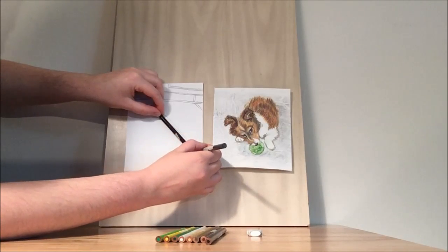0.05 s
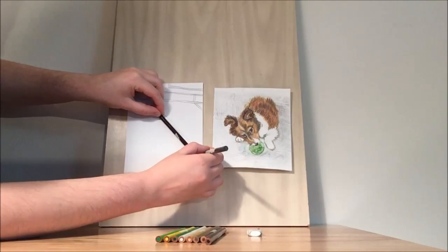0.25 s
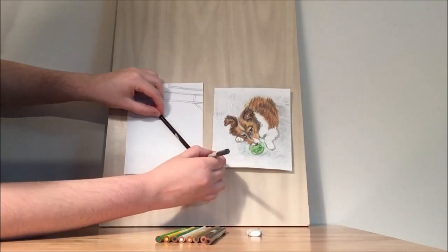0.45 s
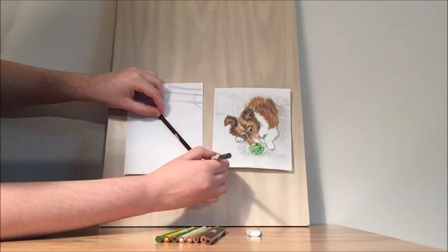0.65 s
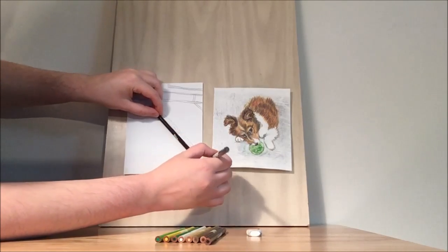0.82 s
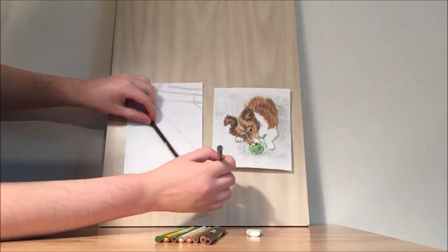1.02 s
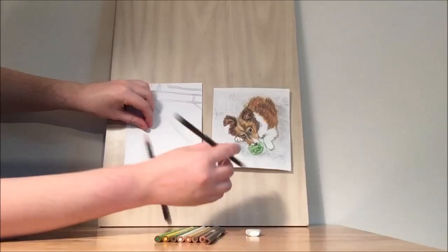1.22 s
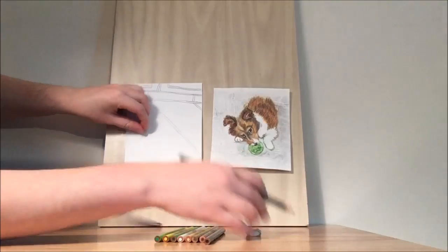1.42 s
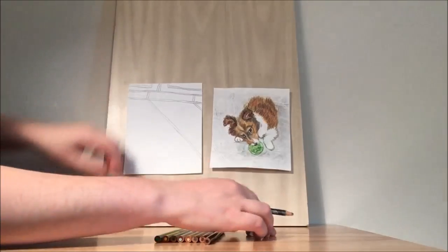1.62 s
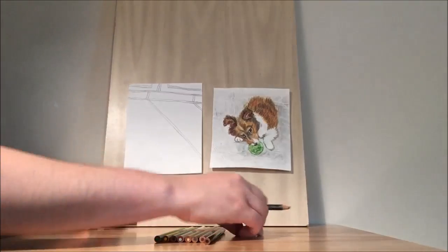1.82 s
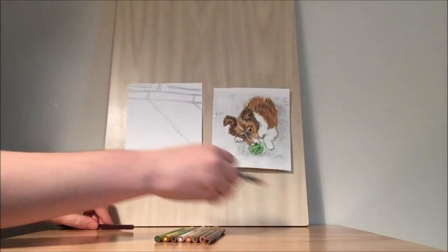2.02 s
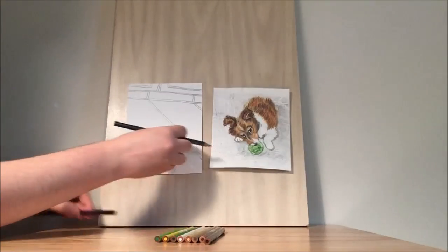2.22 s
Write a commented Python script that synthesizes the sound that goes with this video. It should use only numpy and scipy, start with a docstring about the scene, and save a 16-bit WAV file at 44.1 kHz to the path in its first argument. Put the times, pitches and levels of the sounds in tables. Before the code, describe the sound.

A wooden pencil drops and bounces on a wooden tabletop, then knocks and rattles against other pencils

```python
"""Small hard-walled room with wooden pencils: one rubs and taps on paper pinned to a leaning board,
drops onto the table, bounces, and is knocked against a row of other pencils.
Blows are banks of decaying sine modes; rubbing, rustle and rattle are shaped noise under drawn levels.
The room adds early echoes and a ringing tail, over a low appliance drone and air noise."""
import sys
import numpy as np
from scipy import signal
from scipy.fft import rfft, irfft
from scipy.io import wavfile
from scipy.ndimage import uniform_filter1d

SR = 44100
rng = np.random.default_rng(int(sys.argv[2]) if len(sys.argv) > 2 else 0)


def log_audio(samples):
    """Write samples as a 16-bit WAV file to the path given in sys.argv[1]."""
    # one column per channel
    frames = np.atleast_2d(samples).T
    # limit to full scale, then quantise
    limited = np.clip(frames, -1, 1)
    pcm = np.round(limited * 32767).astype(np.int16)
    wavfile.write(sys.argv[1], SR, pcm)


def how_loud(loudness_db):
    """Turn decibels into a plain amplitude multiplier (0 dB gives 1, 20 dB gives 10)."""
    steps = np.asarray(loudness_db, float) / 20
    return 10 ** steps


N = 99313  # length in samples


def unit(x):
    """Scale to rms 1."""
    return x / np.sqrt(np.mean(x ** 2))


def colour(x, points):
    """Shape a signal's spectrum by (f/Hz, level/dB) points on a log-frequency axis."""
    hz, db = np.array(points, float).T
    f = np.maximum(np.fft.rfftfreq(len(x), 1 / SR), 1)
    gain = how_loud(np.interp(np.log(f), np.log(hz), db))
    return irfft(rfft(x) * gain, len(x))


def band(x, hz, width_hz):
    """Resonant band-pass, gain 1 at the centre."""
    b, a = signal.iirpeak(min(hz, .45 * SR), hz / width_hz, fs=SR)
    return signal.lfilter(b, a, x)


def low_cut(x, order, hz):
    """Butterworth high-pass."""
    return signal.sosfilt(signal.butter(order, hz, "high", fs=SR, output="sos"), x)


def noise(length=N):
    """White noise."""
    return rng.standard_normal(length)


def walk(rate):
    """Random levels held 1 / rate s and slewed twice."""
    k = int(SR / rate)
    steps = np.repeat(noise(N // k + 1), k)
    return 0.45 * uniform_filter1d(uniform_filter1d(steps, k), k)[:N]


def curve(rows):
    """Gain along a (t/s, level/dB) table, -120 dB outside it."""
    s, db = np.array(rows, float).T
    return how_loud(np.interp(np.arange(N) / SR, s, db, left=-120, right=-120))


def decay(t, t60):
    """Exponential decay, falling 60 dB in t60 seconds."""
    return 1000. ** (-t / t60)


CONTACT_S = 0.00076  # a hard pencil blow
MODE_SCATTER_DB, DETUNE = 1.5, .006  # random spread of mode level and relative frequency


def ring(modes, contact_s):
    """One blow on a set of modes, each a little detuned and struck unevenly, rising over the contact time."""
    t = np.arange(SR // 4) / SR
    hz, db, t60 = np.array(modes, float).T[:, :, None]
    uneven, detune, phase = rng.standard_normal((3, len(modes), 1))
    sines = np.sin(2 * np.pi * hz * (1 + DETUNE * detune) * t + phase)
    tones = how_loud(db + MODE_SCATTER_DB * uneven) * sines * decay(t, t60)
    rise = np.sin(np.pi / 2 * np.minimum(t / contact_s, 1)) ** 2
    return tones.sum(axis=0) * rise / 2


def add(out, s, x):
    """Mix x into out from time s."""
    i = int(s * SR)
    out[i:i + len(x)] += x[:N - i]


# tone balance of the room air ahead of its low cut: (f/Hz, level/dB per Hz)
AIR_COLOUR = [(15, -33.5), (25, -8), (82, 3), (134, -13.5), (175, -8.5), (195, -29.5), (236, -10),
              (363, -10), (463, -19.5), (545, -15.5), (1560, -20), (2000, -26), (4200, -38), (16000, -46)]
AIR_DB, AIR_FLICKER_DB = -62, 1


def air():
    """Broad room noise: coloured noise with a slow, slight level flicker."""
    hiss = low_cut(colour(noise(), AIR_COLOUR), 3, 100)
    return how_loud(AIR_DB + AIR_FLICKER_DB * walk(6)) * unit(hiss)


# narrow noise bands of the appliance drone: (f/Hz, first filter width/Hz, level/dB)
DRONE_BANDS = [(85.8, 14, -65), (330.8, 31, -70.5), (395.4, 60, -77.5), (462.2, 7.5, -70), (7930, 200, -92)]
# steady lines of the drone, around which pitch and level waver: (f/Hz, level/dB)
HUM_LINES = [(48, -69.5), (90, -65.5)]
HUM_WAVER, HUM_WAVER_DB = 0.017, 5.5  # relative pitch and level depth per unit of walk


def drone():
    """Low appliance drone: narrow bands of noise and sine lines that waver in pitch and level."""
    out = np.zeros(N)
    for hz, width_hz, db in DRONE_BANDS:
        narrow = band(band(noise(), hz, width_hz), hz, 2 * width_hz)
        out += how_loud(db) * unit(narrow)
    for hz, db in HUM_LINES:
        level = how_loud(db + HUM_WAVER_DB * walk(8.0))
        cycles = np.cumsum(hz * (1 + HUM_WAVER * walk(5.99))) / SR
        out += level * unit(np.sin(2 * np.pi * cycles))
    return out


# pencil tip rubbing, heard through the board: (t/s, level/dB)
RUB_LEVEL = [(.3, -88), (.36, -74.5), (.56, -78), (.6, -79), (.92, -112), (.97, -71.5), (1.02, -76),
             (1.1, -67), (1.2, -70), (1.29, -65.5)]
RUB_HZ, RUB_WIDTH_HZ = 1590, 80


def tip_rub():
    """Uneven friction noise heard through the board's brightest mode."""
    friction = noise() * how_loud(2.9 * walk(37))
    return curve(RUB_LEVEL) * unit(band(friction, RUB_HZ, RUB_WIDTH_HZ))


# taps on the leaning board: (t/s, relative level/dB, extra level of the low modes/dB)
BOARD_TAPS = [(0.597, -39.5, -4), (0.6007, -35, -6.5), (0.630, -60.5, 13.5)]
# leaning board modes, the first two being the low ones: (f/Hz, relative level/dB, t60/s)
BOARD_MODES = [(465, 0.5, 0.19), (680, -4, 0.045), (1230, -5.5, 0.025), (1589, 2.5, 0.032),
               (1718, -10, 0.048)]
TAP_CONTACT_S = 0.00172
TAP_CLICK_DB, TAP_CLICK_T60_S, TAP_CLICK_HZ = -24, .012, 4400  # click level is relative to the tap


def board_taps():
    """Light taps ring the board's modes, each with a short bright click of noise."""
    out, t = np.zeros(N), np.arange(SR // 20) / SR
    for s, db, low_db in BOARD_TAPS:
        low = how_loud(low_db) * ring(BOARD_MODES[:2], TAP_CONTACT_S)
        add(out, s, how_loud(db) * (low + ring(BOARD_MODES[2:], TAP_CONTACT_S)))
        click = band(noise(len(t)), TAP_CLICK_HZ, TAP_CLICK_HZ) * decay(t, TAP_CLICK_T60_S)
        add(out, s, how_loud(db + TAP_CLICK_DB) * click)
    return out


# table top modes, lowest first: (f/Hz, relative level/dB, t60/s)
TABLE_MODES = [(144.2, -7, 0.16), (227, -8.5, 0.075), (272, 3, 0.14), (348.8, -0.5, 0.21), (463, 1.5, 0.05)]
THUD_CONTACT_S = 0.0065


def wrist_bump():
    """A wrist bumps the table: a soft, slow contact ringing only its two lowest modes."""
    out = np.zeros(N)
    add(out, 0.64, how_loud(-38) * ring(TABLE_MODES[:2], 2 * THUD_CONTACT_S))
    return out


# hands shifting on the board: (t/s, level/dB)
HANDS_LEVEL = [(.84, -94), (.88, -60.5), (.93, -69), (.98, -70.5), (1.12, -64.5), (1.2, -70.5), (1.27, -58),
               (1.32, -70)]
# their dull tone balance: (f/Hz, level/dB per Hz)
HANDS_TONE = [(90, -15.5), (140, -1), (200, -9), (300, -5), (450, -10), (900, -12), (2000, -44.5)]


def hands():
    """Hands shifting on the board: dark noise with an uneven level."""
    shuffle = noise() * how_loud(2 * walk(40))
    return curve(HANDS_LEVEL) * unit(colour(shuffle, HANDS_TONE))


# fingers and pencil brushing the paper: (t/s, relative level/dB)
RUSTLE_LEVEL = [(0.9, -100), (0.952, -78.5), (1.045, -75.5), (1.085, -65), (1.14, -64), (1.195, -73),
                (1.23, -65), (1.248, -61.5), (1.288, -58), (1.298, -47), (1.308, -70), (1.4, -68),
                (1.45, -92.5)]
# tone balance laid over the grains: (f/Hz, level/dB per Hz)
RUSTLE_TONE = [(2500, -1.5), (4500, -7.5), (6000, 4), (9000, 5), (10500, 1.5), (12500, 5.5), (15500, 0),
               (16500, -26.5)]
RUSTLE_GAIN_DB, RUSTLE_GRAIN_DB, RUSTLE_PATCH_DB = 3, 11, -5  # overall gain, fast and slow flicker


def paper_rustle():
    """Grainy hiss of skin and wood on paper, each band flickering alone."""
    grains = np.zeros(N)
    for hz in 3000 * 1.25 ** np.arange(8):
        flicker_db = RUSTLE_GRAIN_DB * walk(130) + RUSTLE_PATCH_DB * walk(18)
        grains += band(noise(), hz, hz / 4) * how_loud(flicker_db)
    return how_loud(RUSTLE_GAIN_DB) * curve(RUSTLE_LEVEL) * unit(colour(grains, RUSTLE_TONE))


# the pencil scrapes free of the paper before it lands:
# (start t/s, length before the fade/s, relative level/dB, f/Hz, width of each filter pass/Hz)
PAPER_SCRAPES = [(1.237, 0.037, -55, 5450, 2510), (1.283, 0.026, -39, 1670, 400),
                 (1.284, 0.022, -43.5, 2600, 500)]


def paper_scrapes():
    """Short scrapes: twice band-passed noise, opening over 8 ms and fading over 16 ms."""
    out, t = np.zeros(N), np.arange(SR // 10) / SR
    for s, length, db, hz, width_hz in PAPER_SCRAPES:
        scrape = unit(band(band(noise(len(t)), hz, width_hz), hz, width_hz))
        shape = np.interp(t, [0, .008, length, length + 0.016], [0, 1, 1, 0])
        add(out, s, how_loud(db) * scrape * shape)
    return out


HARD_DB, SOFTER_DB = -14, 14  # a blow SOFTER_DB below a hard one lasts twice as long, four times at most
CRACK_T60_S, ONSET_LOW_CUT_HZ = 0.031, 380


def knocks(rows, low, middle, high, crack_db):
    """Every knock rings three groups of pencil modes and the table, over a rough woody crack of like colour."""
    out, t = np.zeros(N), np.arange(SR // 4) / SR
    for s, low_db, mid_db, high_db, table_db in rows:
        softness = (HARD_DB - max(low_db, mid_db, high_db)) / SOFTER_DB
        contact_s = CONTACT_S * 2 ** np.clip(softness, 0, 2)
        fade = decay(t, CRACK_T60_S) * np.minimum(t / contact_s, 1)
        crack = colour(noise(len(t)) * fade, [
            (80, table_db - 21.5), (250, table_db - 0.5), (600, low_db - 7.5), (2000, (low_db + mid_db) / 2),
            (4500, mid_db + 1.0), (7000, high_db - 6), (16000, high_db - 15.5)])
        pencil = how_loud(crack_db) * crack
        for db, modes in [(low_db, low), (mid_db, middle), (high_db, high)]:
            pencil += how_loud(db) * ring(modes, contact_s)
        # the low cut keeps the abrupt mode onsets from adding bass
        thin = low_cut(pencil, 2, ONSET_LOW_CUT_HZ)
        add(out, s, thin + how_loud(table_db) * ring(TABLE_MODES, THUD_CONTACT_S))
    return out


# the dropped pencil landing and bouncing, levels relative:
# (t/s, low bending level/dB, high bending level/dB, lengthwise level/dB, table thud level/dB)
DROP_KNOCKS = [(1.2967, -17.5, -22, -72, -59), (1.3000, -16.5, -23.5, -75, -44.5),
               (1.3060, -24, -29.5, -75, -38.5), (1.4045, -22.5, -35, -55, -46),
               (1.464, -49, -48, -73.5, -58.5), (1.5150, -65, -65.5, -58, -67.5),
               (1.5371, -19.5, -23, -14, -33.5), (1.5475, -27.5, -33, -21, -58.5),
               (1.5715, -39.5, -53.5, -32.5, -60.5)]
# its low bending, high bending and lengthwise modes: (f/Hz, relative level/dB, t60/s)
DROP_LOW_BENDING = [(670, 3, 0.033), (878, -2, 0.022), (1200, -1, 0.018), (1332, 7, 0.036),
                    (1540, 3, 0.017)]
DROP_HIGH_BENDING = [(1720, 10.5, 0.021), (2088, 8.5, 0.034), (2330, 6.5, 0.012), (2660, -1, 0.016),
                     (2950, 4.5, 0.026), (3295, -2, 0.042), (3900, 3.5, 0.01), (4313, 5, 0.011),
                     (5870, -0.5, 0.031)]
DROP_LENGTHWISE = [(8870, 8, 0.024), (9200, 11.5, 0.014), (12270, -1, 0.02), (12650, 5, 0.013)]


def pencil_drop():
    """The dropped pencil bends and rings along its length at each landing and bounce."""
    return knocks(DROP_KNOCKS, DROP_LOW_BENDING, DROP_HIGH_BENDING, DROP_LENGTHWISE, crack_db=6.5)


# pencils rolling and rattling during and between the knocks: (t/s, level/dB)
RATTLE_LEVEL = [(1.3, -93), (1.32, -48), (1.44, -46.5), (1.53, -57), (1.56, -38.5), (1.7, -54.5),
                (1.73, -43), (1.88, -49.5), (1.96, -47.5), (2.05, -59), (2.15, -68.5)]
# woody tone balance of the rattle: (f/Hz, level/dB per Hz)
RATTLE_TONE = [(120, -30), (250, -3), (500, -3.5), (1000, -1), (2300, 2.5), (4000, -8), (7000, -17.5),
               (14000, -35)]
RATTLE_PER_S, RATTLE_SPREAD_DB, RATTLE_T60_S = 250, 3, 0.012


def rattle():
    """Small irregular contacts, each a short burst of woody noise."""
    strength = how_loud(RATTLE_SPREAD_DB * np.minimum(rng.exponential(size=N), 2))
    ticks = (rng.random(N) < RATTLE_PER_S / SR) * strength
    fading = signal.lfilter([1], [1, -decay(1 / SR, RATTLE_T60_S)], ticks)
    return curve(RATTLE_LEVEL) * unit(colour(fading * noise(), RATTLE_TONE))


# knocks against the row of pencils, levels relative:
# (t/s, low mode level/dB, middle mode level/dB, high mode level/dB, table thud level/dB)
ROW_KNOCKS = [(1.7082, -30.5, -20, -38.5, -37.5), (1.7125, -26.5, -33.5, -32, -41.5),
              (1.8240, -31.5, -38, -47, -41.5), (1.8300, -33.5, -34.5, -57, -41),
              (1.8520, -48, -50, -72, -49), (1.9045, -38, -40, -56, -39), (1.9080, -32.5, -33, -37.5, -40),
              (1.9420, -43, -55, -77, -44.5), (1.9842, -41, -50, -77, -42.5)]
# low, middle and high modes of the row: (f/Hz, relative level/dB, t60/s)
ROW_LOW_MODES = [(661, -3, 0.049), (826, 1, 0.039), (1420, -2.5, 0.0099), (1837, 12.5, 0.015),
                 (1967, 12.5, 0.018), (2380, 10.5, 0.016)]
ROW_MIDDLE_MODES = [(2806, 8.1, 0.016), (3596, 7.7, 0.022), (3964, 4.3, .012), (4414, 7.7, 0.0077),
                    (5810, 15.5, 0.0071), (6546, 13.7, 0.0085)]
ROW_HIGH_MODES = [(8030, 18.5, 0.0058), (9030, 12.5, 0.013), (10600, -16.5, 0.011), (13070, -7.5, 0.023)]


def row_clacks():
    """Knocks against the row ring its pencils' modes, with more crack in proportion than the drop."""
    return knocks(ROW_KNOCKS, ROW_LOW_MODES, ROW_MIDDLE_MODES, ROW_HIGH_MODES, crack_db=10)


# room tail by band: (f/Hz, t60/s, relative level/dB)
ROOM_BANDS = [(262, 0.32, -1.5), (500, 1, -9), (882, 0.67, -5.5), (2050, 0.7, -5.5), (4160, 0.59, -7),
              (8030, 0.51, -7), (13000, 0.32, -10)]
# early reflections: (delay t/s, level/dB)
EARLY_ECHOES = [(.0021, -27), (.0095, -16.5), (0.0245, -18.5), (.031, -17.5)]
ROOM_BUILD_S = 0.011


def room(x):
    """Direct sound, a few early echoes, and a diffuse tail that builds up and dies band by band."""
    t = np.arange(SR) / SR
    build = 1 - np.exp(-(t / ROOM_BUILD_S) ** 2)
    response = np.zeros(SR)
    for hz, t60, db in ROOM_BANDS:
        part = band(band(noise(SR), hz, hz), hz, hz) * decay(t, t60) * build
        response += how_loud(db) * part / np.sqrt(np.sum(part ** 2) * SR / 2 / hz)
    response[0] = 1  # direct sound
    for s, db in EARLY_ECHOES:
        response[int(s * SR)] += how_loud(db)
    return signal.fftconvolve(x, response)[:N]


BOARD_SEND_DB = -7


def scene():
    """Hand sounds in the room over the background; the board excites the room less than the table."""
    background = air() + drone()
    at_board = tip_rub() + board_taps() + wrist_bump() + hands()
    on_paper = paper_rustle() + paper_scrapes()
    pencils = pencil_drop() + rattle() + row_clacks()
    in_room = room(pencils + on_paper + how_loud(BOARD_SEND_DB) * at_board)
    return (in_room + at_board + background)[None]


def top_cut(x):
    """Nothing passes above the cut-off."""
    return signal.sosfilt(signal.butter(12, 17110, fs=SR, output="sos"), x)


def record(dry):
    """Deliver the finished mix."""
    return top_cut(dry)


dry = scene()
out = record(dry)
log_audio(out)
```